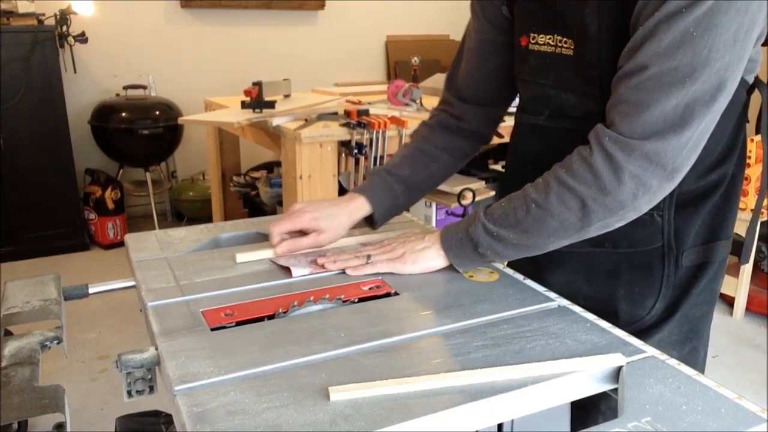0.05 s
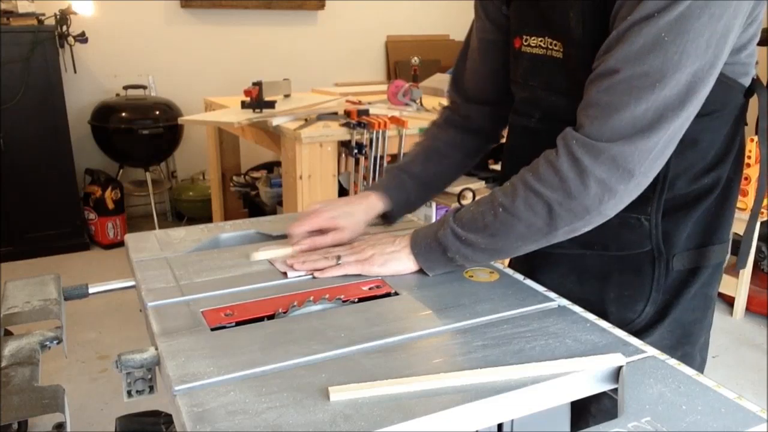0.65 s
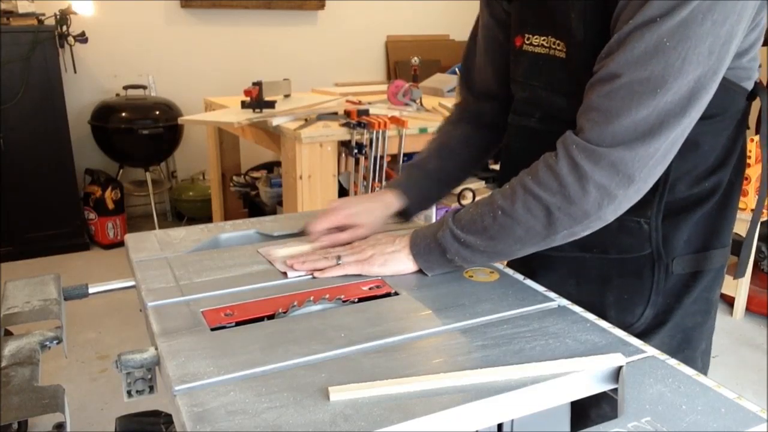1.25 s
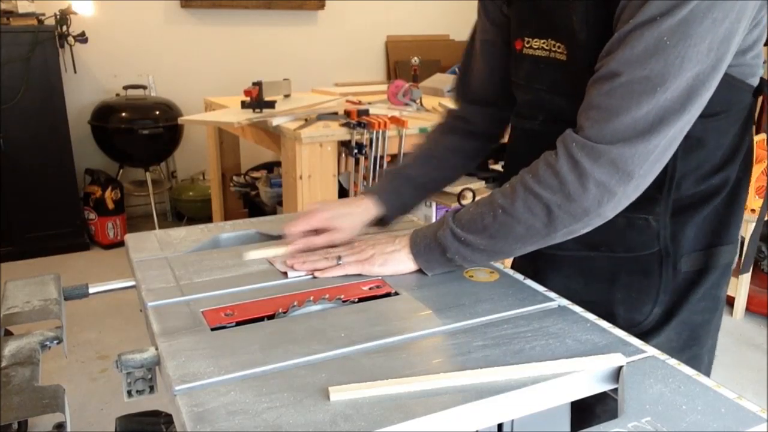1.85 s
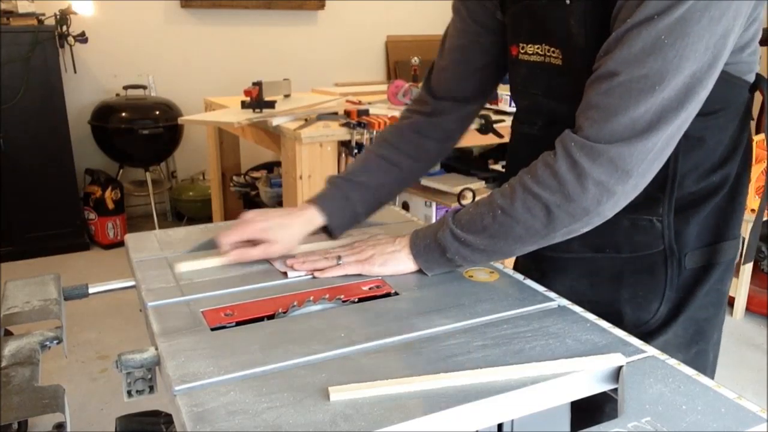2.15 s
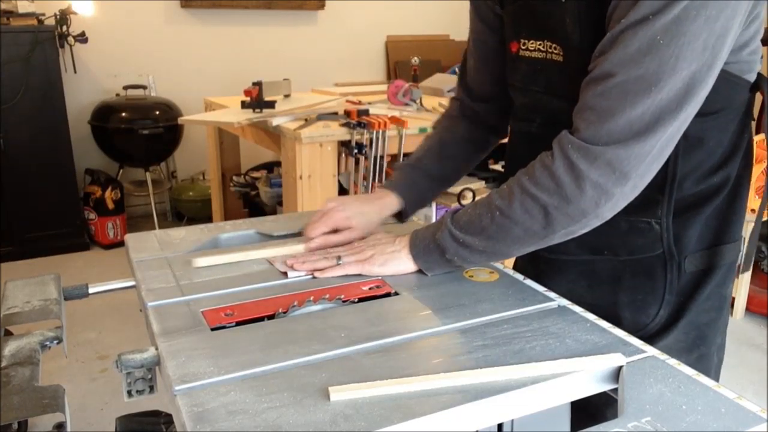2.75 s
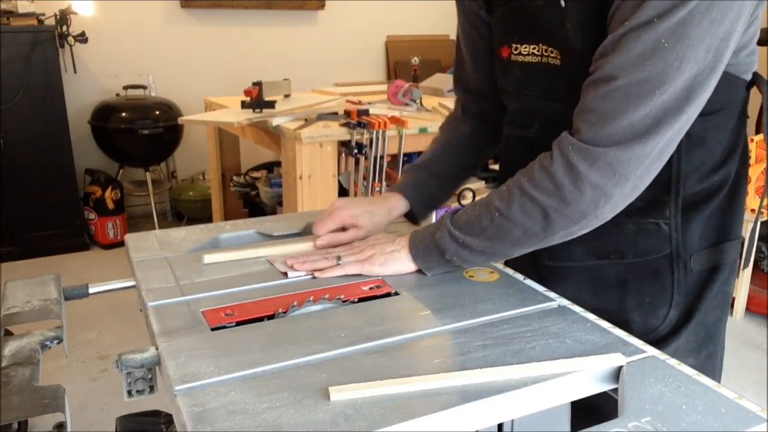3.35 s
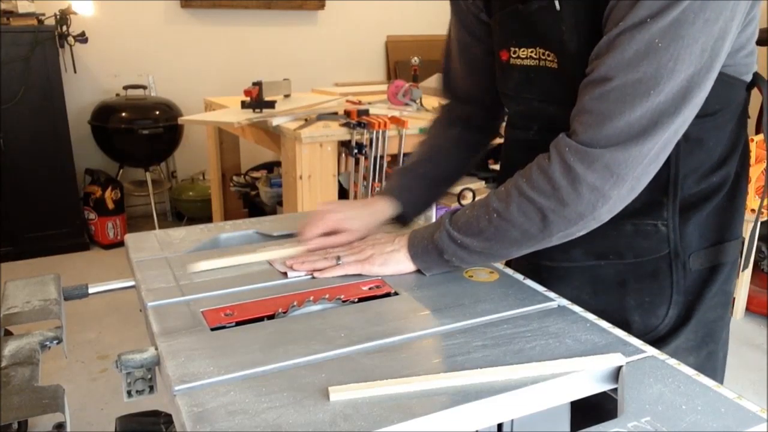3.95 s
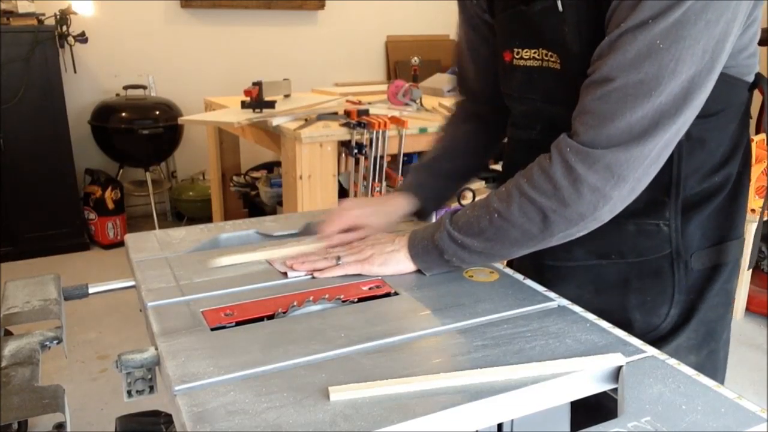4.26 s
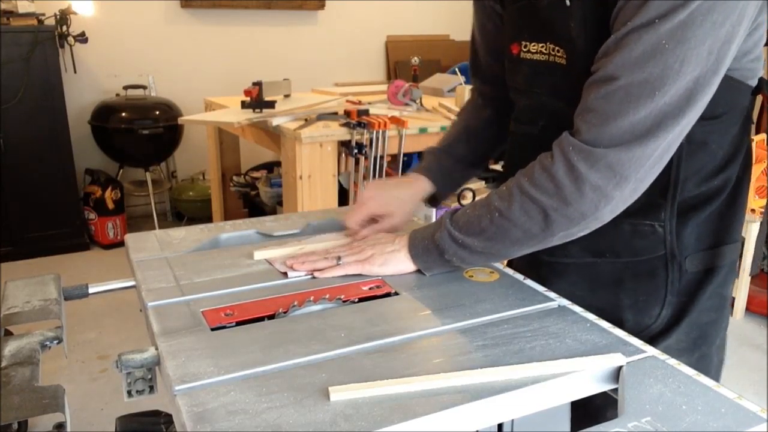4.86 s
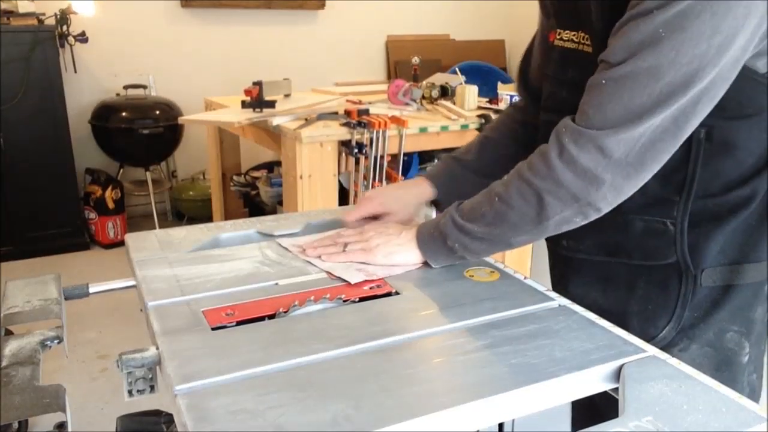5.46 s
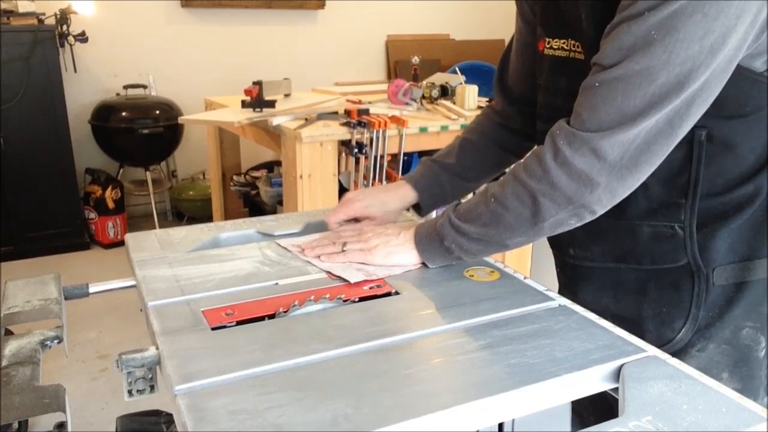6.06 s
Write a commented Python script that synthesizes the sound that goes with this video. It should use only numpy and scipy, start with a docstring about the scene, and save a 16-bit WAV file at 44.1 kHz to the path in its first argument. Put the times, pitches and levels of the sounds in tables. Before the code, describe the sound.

Quick, scratchy hand sanding of wood in a small workshop pauses for a bump, resumes, then gives way to light brushes of paper.

```python
"""A faint rustle and a few light touches, then the quick rasp of a wooden strip rubbed over sandpaper.
The paper lies on a saw table in a small workshop. In two bouts of strokes, grit scratches the wood,
the strip's resonances colour the rasp, and friction drives the table into a low thrum.
Between the bouts the strip is set down with a bump. After them the sound drops out for an instant,
and light brushes and one tiny squeak follow."""
import sys
import numpy as np
from scipy import signal
from scipy.fft import rfft, irfft
from scipy.io import wavfile

SR = 44100
rng = np.random.default_rng(int(sys.argv[2]) if len(sys.argv) > 2 else 0)


def wav_record(signal):
    """Record a signal, one row per channel, as 16-bit PCM in the file named by sys.argv[1]."""
    frames = np.transpose(np.atleast_2d(signal))
    bounded = np.clip(frames, -1, 1)
    # unit amplitude maps onto the largest positive 16-bit level
    quanta = np.round(bounded * 32767).astype(np.int16)
    wavfile.write(sys.argv[1], SR, quanta)


N = 273861
TIME = np.arange(N) / SR

# spectrum of the workshop's still air: frequency_hz, level_db
AIR_SPECTRUM = [(20, -8), (60, -7), (110, -7), (170, 1), (300, -3), (700, -12.5), (2000, -12), (6000, -21),
                (15500, -20)]
# reverberation time of the workshop: frequency_hz, t60_s
ROOM_DECAY = [(150, 0.45), (600, 0.7), (2000, 0.48), (5000, 0.62), (9000, 0.55), (15000, 0.21)]
# modes of the saw table: pitch_hz, level_db, t60_s
TABLE_MODES = [(165.4, -1.5, 0.36), (182.8, 1.5, 0.25), (245.3, 3, 0.19), (309.3, -2.5, 0.29),
               (378.6, -2, 0.28), (469, -5.5, 0.29), (535.4, -4, 0.33), (553, -4, 0.14), (721.6, 2.5, 0.18),
               (1610, -0.5, 0.12), (2950, -16, .15), (4440, -7, .15), (8200, -19, .15)]
# bending modes of the strip: pitch_hz, width_hz, level_db
STRIP_MODES = [(1043, 95, -19), (1263, 56, -14), (1530, 210, -16), (1950, 420, -13.5), (2380, 300, -12.5),
               (3560, 480, -11)]
# narrow resonances of strip and table top: pitch_hz, width_hz, level_db
RESONANCES = [(725, 63, -4), (945, 19, -1), (1200, 10, -43), (1808, 10, -25), (2500, 21, -29),
              (3174, 98, -7), (4850, 160, -8.5)]
# spectra of friction noise: frequency_hz, level_db
PAPER_SPECTRUM = [(100, -23), (300, -7), (550, -6), (1000, -2), (1600, -1), (2400, -0.5), (3300, 1),
                  (4200, -2.5), (5000, -3.5), (6200, -9.5), (9000, -14.5), (15500, -19)]  # the loose sheet
FIZZ_SPECTRUM = [(1500, -32), (4500, 0.5), (6500, 0), (8000, 1), (10000, -0.5), (13500, 0), (15500, -2.5)]  # grit breaking fibres
FLAT_SPECTRUM = [(100, -35), (400, -16), (600, -11.5), (740, -6), (860, -9.5), (1000, -6.5), (1450, 1.5),
                 (2400, 3), (2750, -2.5), (3500, 2), (4300, -1.5), (5100, -1.5), (6500, -8), (9000, -38.5)]  # the strip lying flat
TILTED_SPECTRUM = [(100, -32), (400, -17), (600, -12), (740, -5), (860, -4.5), (980, 3), (1230, 1),
                   (1400, -6.5), (2450, 0), (2750, -6), (3500, 1.5), (5100, -3), (6500, -7), (9000, -19.5)]  # the strip tilted, ringing hollow
# shifts of the holding hand on the sheet: start_s, length_s, level_db
HAND_SHIFTS = [(-.05, 0.49, -50.5), (2.558, .13, -51), (5.072, 0.388, -48), (5.472, 0.81, -51)]
# one squeak of the sheet: start_s, length_s, from_hz, to_hz
SHEET_SQUEAK = (5.490, .012, 6000, 8200)
# the strip sliding out: start_s, length_s, from_hz, to_hz, width_hz, level_db
STRIP_SLIDES = [(2.189, 0.051, 1200, 744, 90, -46), (2.22, 0.061, 770, 720, 50, -48),
                (5.68, 0.076, 2330, 1000, 520, -39.5)]
# blows of strip and hand on the table: start_s, level_db, contact_s, relative_click_db
BLOWS = [(.393, -45.5, .003, -16), (2.533, -49, 0.0007, -1), (2.560, -40.5, .0001, -3.5),
         (2.589, -30.5, .0055, -21), (3.352, -41, 0.0031, -20), (3.756, -44, .0016, -22),
         (5.070, -54, .0001, 9), (5.084, -57, .0001, 3), (5.43, -45.5, .0028, -22)]
# light passes of wood and hand over the paper: start_s, length_s, level_db, relative_fizz_db
LIGHT_PASSES = [(0.051, 0.077, -37, -1.5), (0.348, .065, -43.3, -6.5), (0.433, .05, -35.5, -2),
                (5.22, 0.11, -45, -6.5), (5.385, 0.034, -41.5, -4), (5.542, 0.057, -43, 0),
                (5.669, .085, -37, -20), (5.827, .11, -37, -17), (5.987, 0.055, -40, -23),
                (6.09, .075, -35, -12), (6.187, .06, -38, -9)]
# slow drift of the grip: time_s, tilt_fraction, relative_fizz_db
GRIP_DRIFT = [(.55, 1.0, -4), (1.3, 0.68, -4), (2.15, 0.53, -6.6), (2.78, 0.67, -6.5), (3.2, 0.52, -8),
              (3.7, 0.24, -7), (4.2, 0.12, -5), (4.75, 0, -6)]
# sanding strokes, each lasting until the next or until the arm stops: start_s, level_db
SANDING_STROKES = [(.448, -26), (0.612, -27), (0.764, -26), (.917, -27), (1.053, -26.5), (1.202, -27),
                   (1.335, -26.5), (1.477, -25), (1.617, -25.5), (1.749, -24.5), (1.908, -25), (2.038, -25),
                   (2.684, -31), (2.879, -26.9), (3.03, -25.5), (3.162, -23.5), (3.307, -24), (3.44, -24),
                   (3.584, -24), (3.716, -24.5), (3.853, -24.5), (3.99, -26), (4.114, -25.5), (4.262, -25),
                   (4.39, -25), (4.529, -24.5), (4.664, -25)]
# the arm comes to rest after each bout: time_s
ARM_STOPS = [2.26, 4.84]
# an instant of near silence: time_s, gain_db
DROPOUT = [(5.146, 0), (5.149, -26), (5.175, -27), (5.18, -40), (5.193, -40), (5.195, 0)]


def amp(db):
    """Amplitude ratio of a level in decibels."""
    return np.exp(np.asarray(db) * (np.log(10) / 20))


def unit(x):
    """Normalisation to rms 1."""
    return x / np.sqrt(np.mean(x ** 2) + 1e-20)


def read(points, hz):
    """Interpolation on a logarithmic frequency axis."""
    frequency, value = np.transpose(points)
    return np.interp(np.log(hz + 1), np.log(frequency + 1), value)


def add(mix, start_s, sound):
    """Superposition: a sound adds to the mix from its start time."""
    part = mix[max(round(start_s * SR), 0):][:len(sound)]
    part += sound[:len(part)]


def gate(start_s, length_s, attack_s, release_s):
    """Trapezoidal envelope, 0-1: attack, hold and release."""
    return np.clip(np.minimum((TIME - start_s) / attack_s, 1 + (start_s + length_s - TIME) / release_s),
                   0, 1)


def wander(rate_hz):
    """Random modulation: low-passed noise of rms 1."""
    t = TIME[::32]
    hz = np.fft.rfftfreq(len(t), t[1])
    spectrum = rfft(rng.standard_normal(len(t))) / (1 + (hz / rate_hz) ** 4)
    return np.interp(TIME, t, unit(irfft(spectrum, len(t))))


def colour(x, spectrum, resonances=()):
    """Minimum-phase filtering by a broad spectrum with narrow peaks; rms 1."""
    hz = abs(np.fft.fftfreq(8192, 1 / SR))
    peaks = sum(amp(db) / (1 + (2 * (hz - centre) / width) ** 2) for centre, width, db in resonances)
    gain = amp(read(spectrum, hz)) * (1 + peaks)
    taps = np.fft.ifft(np.exp(np.conj(signal.hilbert(np.log(gain))))).real
    return unit(signal.oaconvolve(x, taps[:len(taps) // 2])[:N])


def resonate(x, hz, width_hz):
    """Forced response of a steep resonance with a moving centre; rms 1."""
    carrier = np.exp(2j * np.pi * np.cumsum(hz) / SR)
    pole = np.exp(-np.pi * width_hz / SR)
    return unit((carrier * signal.lfilter([1.], [1, -2 * pole, pole * pole], x / carrier)).real)


def grit(per_s, spread_db):
    """Shot noise: clicks of single grains, a few much larger, with equal power at any rate."""
    chance = np.clip(per_s / SR, 1e-3, 1)
    size = amp(spread_db * np.minimum(rng.exponential(1, N), 4.5))
    draw = rng.uniform(-1, 1, N)
    return unit(size * np.sign(draw) * (abs(draw) < chance) / np.sqrt(chance))


def still_air():
    """Ambient noise: steady, and strongest at low frequencies."""
    return amp(-58) * colour(rng.standard_normal(N), AIR_SPECTRUM)


def workshop(x, wet_db, first_echo_s):
    """Reverberation: dense reflections die away, each band at its own rate."""
    t = TIME[:SR // 2]
    draw = rng.uniform(-1, 1, (3, len(t)))
    echoes = np.sign(draw) * (abs(draw) < 4000 / SR) * (t > first_echo_s)
    hz, age_s, bands = signal.stft(echoes, SR, nperseg=256)
    decay = amp(-60 * age_s / read(ROOM_DECAY, hz)[:, None])
    tails = signal.istft(bands * decay, SR, nperseg=256)[1]
    tails /= np.linalg.norm(tails, axis=1, keepdims=True)
    # three tails take turns, so the reflections keep shifting
    shares = np.cos(np.pi * (7 * TIME + np.arange(3)[:, None] / 3)) * np.sqrt(2 / 3)
    wet = signal.fftconvolve(x * shares, tails, axes=1)[:, :N].sum(0)
    return (x + amp(wet_db) * wet) / np.hypot(1, amp(wet_db))


def table_ring():
    """Impulse response of the table: damped modes, neighbours swinging in opposite senses."""
    t = TIME[:SR // 3]
    return sum((-1) ** k * amp(db - 60 * t / t60_s) * np.sin(2 * np.pi * hz * t)
               for k, (hz, db, t60_s) in enumerate(TABLE_MODES))


def table_thrum(force):
    """Forced vibration: friction drives the table's modes."""
    ring = table_ring()
    return signal.oaconvolve(force, ring / np.linalg.norm(ring))[:N]


def strip_bending(grains):
    """Resonance: each ringing tone of the strip swells and fades at random, varying the rasp's colour."""
    out = np.zeros(N)
    for hz, width_hz, db in STRIP_MODES:
        b, a = signal.iirpeak(hz, hz / width_hz, fs=SR)
        swell = np.sin(wander(rate_hz=7.4))
        out += amp(db) * unit(signal.lfilter(b, a, grains) * swell)
    return out


def holding_hand():
    """Uneven friction: the envelope of the rustle as the hand shifts on the sheet."""
    shifts = sum(amp(db) * gate(start_s, length_s, attack_s=.02, release_s=.02)
                 for start_s, length_s, db in HAND_SHIFTS)
    return shifts * amp(1.6 * wander(rate_hz=11))


def squeak():
    """Stick-slip oscillation: a brief whistle rises as the sheet slides."""
    start_s, length_s, from_hz, to_hz = SHEET_SQUEAK
    hz = np.linspace(from_hz, to_hz, round(length_s * SR))
    whistle = np.sqrt(2) * np.sin(2 * np.pi * np.cumsum(hz) / SR)
    out = np.zeros(N)
    add(out, start_s, amp(-40.5) * np.hanning(len(hz)) * whistle)
    return out


def slides():
    """Resonance falls with length: friction excites the strip's free end as it slides out."""
    out = np.zeros(N)
    for start_s, length_s, from_hz, to_hz, width_hz, db in STRIP_SLIDES:
        hz = np.geomspace(from_hz, to_hz, round(length_s * SR))
        scrape = resonate(rng.standard_normal(len(hz)), hz, width_hz)
        add(out, start_s, amp(db) * signal.windows.tukey(len(hz), .5) * scrape)
    return out


def bumps():
    """Impact: a blow rings the table and clicks on the paper; long contact excites only low modes."""
    out, ring = np.zeros(N), table_ring()
    t = TIME[:len(ring)]
    crunch = colour(rng.standard_normal(N), PAPER_SPECTRUM)
    for start_s, db, contact_s, click_db in BLOWS:
        force = np.hanning(round(contact_s * SR) + 3)
        thud = np.convolve(ring, force / force.sum())[:len(t)]
        click = crunch[round(start_s * SR):][:len(t)] * np.exp(-t / 0.02)
        add(out, start_s, amp(db) * (amp(-3.5) * thud + amp(click_db) * click))
    return out


def pass_envelopes():
    """Amplitude follows speed as a pass bites, swells and lets go: speed, rasp, fizz and thrum."""
    bite, thrum_db = .48, -18  # bite: the share of top speed at which a pass catches
    power = np.zeros((4, N))
    for start_s, length_s, db, fizz_db in LIGHT_PASSES:
        arch = np.sin(np.pi * np.clip((TIME - start_s) / length_s, 0, 1))
        speed = gate(start_s, length_s, attack_s=.0025, release_s=.013) * (bite + (1 - bite) * arch)
        power += np.outer(amp([0, db, db + fizz_db, db + thrum_db]), speed) ** 2
    return np.sqrt(power)


def brushing():
    """Light friction: the passes and the shifting hand add in power and set the sheet hissing."""
    speed, rasp, fizz, thrum = pass_envelopes()
    grains = grit(per_s=6000 + 8000 * speed, spread_db=2.5)
    hand = holding_hand()
    hiss = colour(grains, PAPER_SPECTRUM, RESONANCES) + amp(-4.5) * strip_bending(grains)
    sheet = np.hypot(amp(-1.05) * rasp, amp(0.3) * hand) * hiss
    fibres = amp(-3) * fizz * colour(grit(per_s=6000, spread_db=1.5), FIZZ_SPECTRUM)
    force = np.hypot(amp(-4.5) * thrum, amp(-16.5) * hand) * grains
    return amp(0.3 * wander(rate_hz=110)) * (sheet + fibres) + table_thrum(force)


def stroke_envelopes():
    """Reciprocating motion, each stroke from rest to rest: envelopes of speed, rasp, fizz and thrum."""
    push_peak, pull_peak, coast_peak = .57, .51, .44  # share of the stroke at which it is fastest
    overlap_s, push_fizz_db = .007, 0.5
    power = np.zeros((4, N))
    starts = np.array([start for start, _ in SANDING_STROKES])
    grip_s, tilts, fizzes_db = np.transpose(GRIP_DRIFT)
    for start, db in SANDING_STROKES:
        stop = min(s for s in ARM_STOPS if s > start)
        later = starts[(starts > start) & (starts < stop)]
        push = len(later) % 2 == 0  # every bout ends on a push
        if len(later):
            end, peak = later[0] + overlap_s, push_peak if push else pull_peak
        else:
            end, peak = stop, coast_peak
        fastest = start + peak * (end - start)
        fizz_db = np.interp(fastest, grip_s, fizzes_db) + push_fizz_db * push
        tilt = np.interp(fastest, grip_s, tilts)
        thrum_db = np.interp(tilt, [0, 1], [-22, -27.5])  # a flat strip shakes the table more
        span = slice(round(start * SR), round(end * SR))
        speed = np.sin(np.pi * np.interp(TIME[span], [start, fastest, end], [0, .5, 1])).clip(0)
        rasp = amp(db) * np.tanh(1.256 * speed ** 1.27) / np.tanh(1.3)  # levels off in mid-stroke
        fizz = amp(db + fizz_db) * speed ** 1.064  # treble needs speed
        thrum = amp(db + thrum_db) * speed ** 0.12  # the table is shaken even at the turns
        power[:, span] += np.square([speed, rasp, fizz, thrum])
    return np.sqrt(power)


def sanding():
    """Abrasion: grains strike the wood more often as it speeds up; the contact catches and slips."""
    speed, rasp, fizz, thrum = stroke_envelopes()
    grains = grit(per_s=3000 + 12000 * speed, spread_db=2.5)
    catch = amp(0.3 * wander(rate_hz=44))
    grip_s, tilts, _ = np.transpose(GRIP_DRIFT)
    tilt = np.interp(TIME, grip_s, tilts).clip(0, 1)  # the strip flattens during each bout
    flat = colour(grains, FLAT_SPECTRUM, RESONANCES)
    hollow = colour(grains, TILTED_SPECTRUM, RESONANCES)
    scratch = (1 - tilt) * flat + tilt * hollow
    bending = strip_bending(grit(per_s=5000, spread_db=2.5))
    chatter = amp(0.42 * wander(rate_hz=71))
    wood = (amp(-1.04) * scratch + amp(-0.4) * bending) * chatter
    fibres = colour(grit(per_s=4000 + 14000 * speed, spread_db=2), FIZZ_SPECTRUM)
    return catch * (rasp * wood + amp(1.25) * fizz * fibres) + amp(-1.5) * table_thrum(thrum * grains)


def scene():
    """Superposition of all sources in the room, the same on both channels."""
    bench = sanding() + brushing() + slides() + bumps() + squeak()
    mono = workshop(bench, wet_db=-6.5, first_echo_s=0.0055) + still_air()
    return np.array([mono, mono])


def record(dry):
    """Filtering and gating: the microphone's low cut, an instant of near silence, a band limit."""
    low_cut_hz, band_edge_hz = 129, 15550
    thin = signal.sosfilt(signal.butter(2, low_cut_hz, "highpass", fs=SR, output="sos"), dry)
    dropout = amp(np.interp(TIME, *np.transpose(DROPOUT)))
    low_pass = signal.firwin(511, band_edge_hz, window=("kaiser", 9), fs=SR)
    return signal.oaconvolve(thin * dropout, low_pass[None], "same", axes=1)


dry = scene()
out = record(dry)
wav_record(out)
```